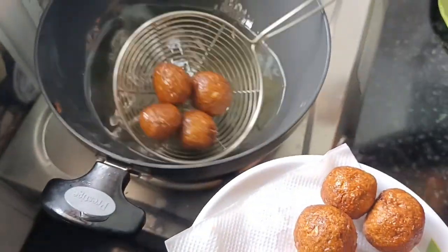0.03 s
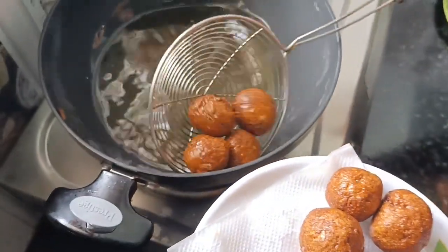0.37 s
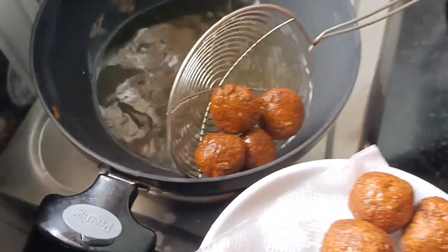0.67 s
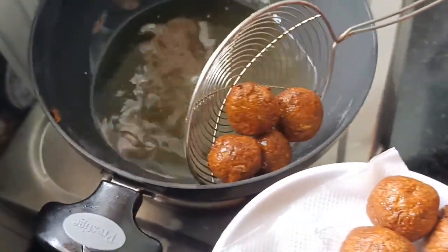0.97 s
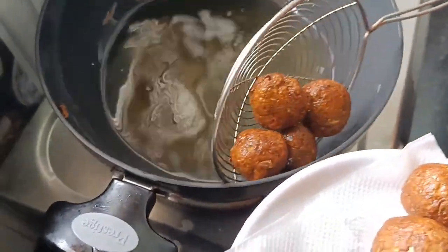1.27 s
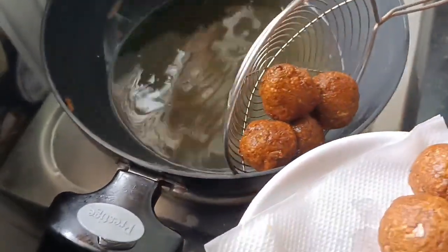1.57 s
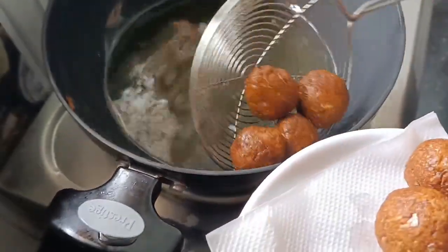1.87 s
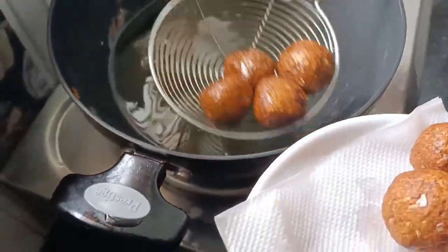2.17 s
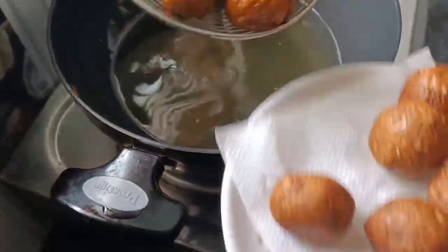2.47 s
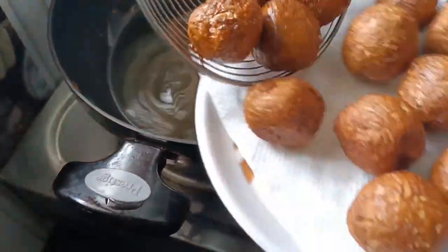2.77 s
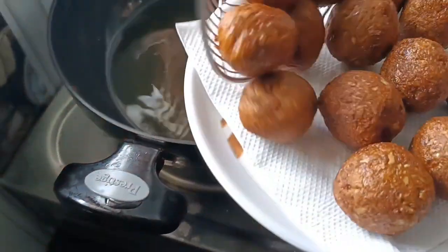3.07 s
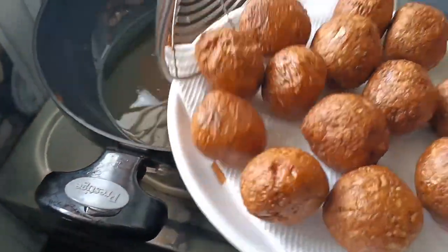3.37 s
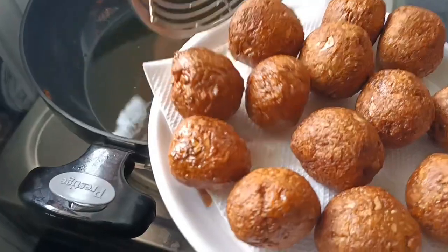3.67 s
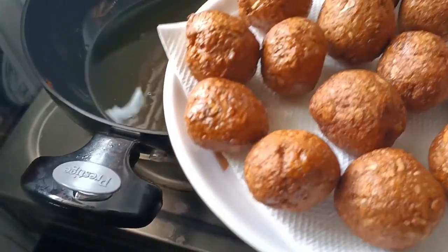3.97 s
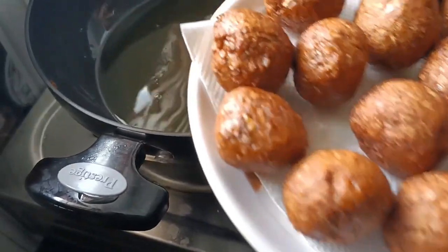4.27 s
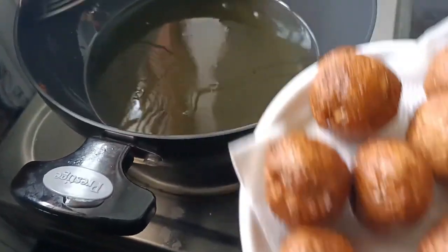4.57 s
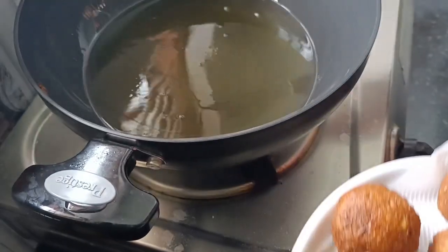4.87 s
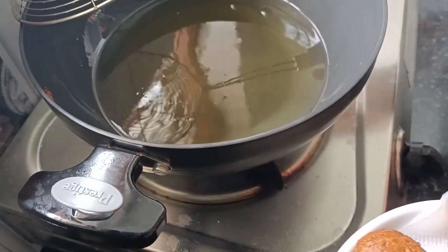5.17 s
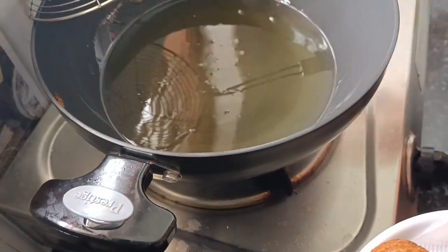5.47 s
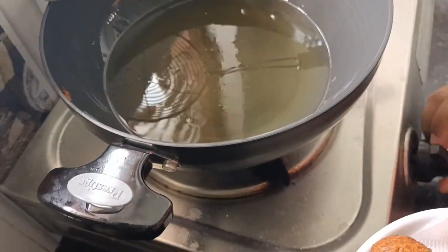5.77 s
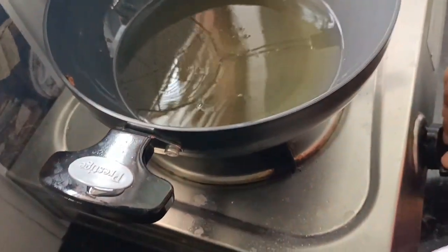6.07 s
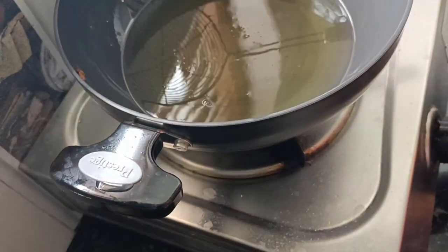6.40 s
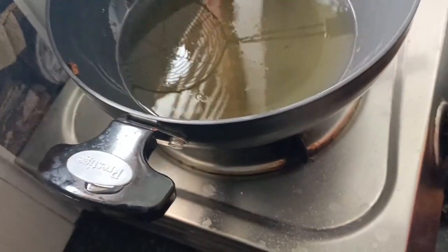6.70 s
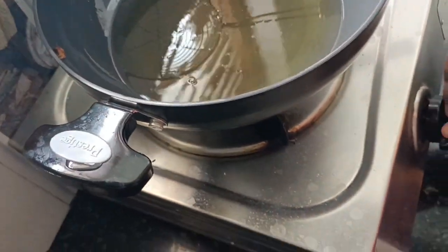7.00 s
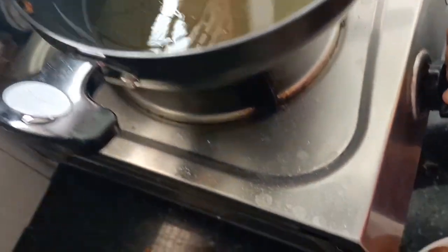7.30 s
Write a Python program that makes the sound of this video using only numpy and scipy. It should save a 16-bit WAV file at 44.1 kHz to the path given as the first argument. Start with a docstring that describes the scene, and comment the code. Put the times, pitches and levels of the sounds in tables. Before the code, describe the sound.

Oil sizzles lightly as a wire strainer scrapes, squeaks and clinks in a pan, then is dropped on steel with a clank and clatter.

```python
"""Oil sizzles lightly over a low kitchen drone. From 0.2 s the pan is nudged and a wire strainer scrapes,
squeaks and clinks in it, lifting fried balls onto a plate with soft knocks. At 4.6 s the strainer is
dropped on steel beside the stove: one clank, then a clatter at 5.1 s. From 5.75 s the oil settles under
a few last clinks and squeaks, and the drone swells. A phone close by hears it all through two ports,
each with its own treble colour."""
import sys
import numpy as np
from scipy import signal
from scipy.fft import rfft, irfft, next_fast_len
from scipy.io import wavfile

SR = 44100
rng = np.random.default_rng(int(sys.argv[2]) if len(sys.argv) > 2 else 0)


def pcm_store(signal):
    """Save signal as 16-bit PCM."""
    levels = np.round(np.clip(np.atleast_2d(signal), -1, 1) * 32767)
    wavfile.write(sys.argv[1], SR, levels.astype(np.int16).T)


N = 323694
TIME_S = np.arange(N) / SR
EVENT_N = int(.7 * SR)
EVENT_S = np.arange(EVENT_N) / SR


def undb(db):
    """Decibels to gain."""
    return 10 ** (np.asarray(db) / 20)


def unit(x):
    """Scale to rms 1."""
    return x / np.sqrt(np.mean(x ** 2) + 1e-20)


def shape(x, gain):
    """Filter x by gain(Hz)."""
    size = next_fast_len(x.shape[-1])
    hz = np.maximum(np.arange(size // 2 + 1) * SR / size, 1)
    return irfft(rfft(x, size) * gain(hz), size)[..., :x.shape[-1]]


def colour(points):
    """Gain curve through (frequency [Hz], level [dB]) points."""
    hz, db = np.transpose(points)
    return lambda f: undb(np.interp(np.log(f), np.log(hz), db))


def peak(hz, width_hz):
    """Gain curve of a resonance."""
    return lambda f: 1 / (1 + ((f - hz) / width_hz) ** 2)


def stereo(pair, apart_hz=700, bass_side=0.014):
    """Left and right from two signals: alike in the bass, unrelated in the treble."""
    side = shape(pair[1], lambda f: bass_side + f ** 2 / (f ** 2 + apart_hz ** 2))
    return np.array([pair[0] + side, pair[0] - side])


def noise(gain, size=EVENT_N):
    """Coloured stereo noise, rms 1."""
    return unit(shape(stereo(rng.standard_normal((2, size))), gain))


def walk(rate_hz, size=EVENT_N):
    """Smooth random drift, rms 1."""
    return unit(shape(rng.standard_normal(size), lambda f: 1 / (1 + (f / rate_hz) ** 4)))


def attack(rise_s):
    """Build-up of a contact."""
    return 1 - np.exp(-EVENT_S / max(rise_s, .0002))


def fade(t60_s):
    """Exponential decay."""
    return np.exp(-np.log(1000) * EVENT_S / max(t60_s, .005))


def arch(time_s, length_s, fullness):
    """Smooth rise and fall; a lower exponent is squarer."""
    return np.maximum(np.sin(np.pi * np.clip(time_s / length_s, 0, 1)), 1e-12) ** fullness


def add(out, at_s, sound):
    """Mix a sound in at a time."""
    start = int(at_s * SR)
    out[:, start:start + sound.shape[1]] += sound[:, :N - start]


def modes(hz, spread_hz, t60_s, build_cycles=1.1, count=7):
    """Similar wires flank each mode with weaker partials; axes (mode, partial, time)."""
    offset = np.linspace(-1, 1, count)
    weight = 1 / (1 + 1.5 * np.abs(offset))
    partial_hz = hz[:, None] + spread_hz[:, None] * offset * rng.uniform(0.503, 2.45, (len(hz), count))
    phase = 2 * np.pi * partial_hz[..., None] * EVENT_S
    # energy takes some cycles to spread from the contact: low modes come late
    envelope = np.array([fade(t) * attack(build_cycles / f) for f, t in zip(hz, t60_s)])
    envelope = envelope[:, None] * weight[:, None] / np.linalg.norm(weight)
    return np.concatenate([np.sin(phase) * envelope, np.cos(phase) * envelope], axis=1)


def ring(bank, mode_db, width=0.64):
    """Each blow shares its energy among the partials anew, per port."""
    mid = rng.choice([-1., 1.], bank.shape[:2])
    side = width * rng.standard_normal(bank.shape[:2])
    weights = np.array([mid + side, mid - side]) * undb(mode_db)[:, None] / np.sqrt(1 + width ** 2)
    return np.tensordot(weights, bank, 2)


def sizzle(bursts_per_s=2500, start_db=-50, sag_db_per_s=0.54, settle_at_s=5.75, settle_db_per_s=7):
    """Tiny steam bubbles burst over a flickering hiss, dying down as the oil settles."""
    # oil spectrum: (frequency [Hz], level [dB])
    oil = [(290, -76), (500, -2.5), (1810, -3.5), (2350, -1.5), (2830, -3.5), (3420, -5.5), (7240, -10.5),
           (8250, -6.5), (14100, -7), (15800, -7)]
    bursts = (rng.random((2, N)) < bursts_per_s / SR) * rng.standard_normal((2, N))
    bursts *= undb(2 * np.minimum(rng.exponential(size=(2, N)), 6))  # a few stand out
    fizz = stereo(.5 * unit(bursts) + rng.standard_normal((2, N)))
    db = start_db - sag_db_per_s * TIME_S - settle_db_per_s * np.maximum(TIME_S - settle_at_s, 0)
    return unit(shape(fizz, colour(oil))) * undb(db + 1.5 * walk(15, N))


def kitchen(drone_hz=84.4, wander_hz=3.48, drone_db=-53, air_db=-52.5):
    """A wavering low drone that swells now and then, two faint hums and a rush of air."""
    # drone swells: (time [s], length [s], level [dB])
    swells = [(.28, 0.17, -48), (0.792, 0.18, -46.5), (2.248, 0.4, -49), (4.53, 0.4, -50.5),
              (5.18, 0.13, -48), (5.798, .35, -45.5), (6.314, .26, -39.5), (6.523, 0.31, -39.5),
              (7.272, 0.36, -33.5)]
    # hums: (frequency [Hz], width [Hz], level [dB])
    hums = [(110, 31, -58), (214.9, 17.6, -58)]
    # air spectrum: (frequency [Hz], level [dB])
    air_colour = [(20, -5.5), (45, 15.5), (65, -0.5), (150, -12.5), (210, 1.5), (300, -3), (450, -3.5),
                  (800, -8.5), (1500, -10.5), (3000, -13), (6000, -24)]
    pitch_hz = drone_hz + wander_hz * walk(7.84, N)
    tone = unit(np.sin(2 * np.pi * np.cumsum(pitch_hz) / SR))
    base = undb(drone_db) * unit(undb(4 * walk(9.1, N)))
    surge = sum(undb(db) * arch(TIME_S - at_s, length_s, 0.77) for at_s, length_s, db in swells)
    surge *= undb(2 * walk(14, N))
    hum = sum(undb(db) * noise(peak(hz, width_hz), N) for hz, width_hz, db in hums)
    air = noise(colour(air_colour), N) * undb(air_db + 1.03 * walk(10, N))
    return tone * np.hypot(base, surge) + hum + air


def nudges(body_hz=211, width_hz=8.8):
    """The pushed pan hums in its body resonance and rubs on its stand."""
    # pushes: (time [s], length [s], body [dB], rub [dB])
    pushes = [(0.158, 0.65, -50, -53), (1.988, 0.7, -51, -52), (5.61, 0.27, -53, -52.5)]
    # rub spectrum: (frequency [Hz], level [dB])
    rub_colour = [(100, -25), (250, 10), (450, -2), (800, -3.5), (1500, -6), (3000, -7.5), (6000, -28)]
    body = noise(peak(body_hz, width_hz), N)
    rub = noise(colour(rub_colour), N)
    return sum(arch(TIME_S - at_s, length_s, 0.54) * (undb(body_db) * body + undb(rub_db) * rub)
               for at_s, length_s, body_db, rub_db in pushes)


def scrapes(slip_db=1.2, hiss=0.08, edge=0.11):
    """Wire dragged over the pan rasps in uneven slips."""
    # strokes: (time [s], length [s], level [dB], resonance tilt [dB/oct])
    strokes = [(0.231, 0.045, -52, -9), (2.065, 0.079, -43.5, -12)]
    # dragged-wire resonances: (frequency [Hz], width [Hz], level [dB])
    resonances = [(3060, 97, -7.5), (3920, 59, -8.5), (5210, 170, -2.5), (6560, 340, -7), (8150, 110, 4),
                  (10600, 540, 10)]
    out = np.zeros((2, N))
    for at_s, length_s, db, tilt in strokes:
        rasp = noise(lambda f: hiss * f / (f + 3000) + sum(
            undb(peak_db + tilt * np.log2(hz / 5000)) * peak(hz, width_hz)(f)
            for hz, width_hz, peak_db in resonances))
        pressure = np.clip(np.minimum(EVENT_S, length_s * (1 + edge) - EVENT_S) / (edge * length_s), 0, 1)
        add(out, at_s, undb(db) * pressure * unit(rasp * undb(slip_db * walk(100))))
    return out


def squeaks(waver_db=2.1, jitter_rate_hz=220):
    """Wire sticks and slips in step with one mode; pressure glides the pitch, jitter roughens it."""
    # squeaks: (time [s], length [s], pitch [Hz], glide [Hz/s], roughness [Hz], level [dB], octave [dB])
    slips = [(0.229, 0.041, 3430, 0, 20, -48.5, -30), (0.229, .07, 3800, 0, 51, -52, -30),
             (0.476, 0.2, 3353, 0, 21, -44.5, -35), (0.663, 0.096, 3340, 0, 24, -51, -35),
             (.81, .14, 3353, 0, 22, -56.5, -35), (.93, 0.4, 3376, -7, 35, -65, -30),
             (1.719, 0.2, 2632, 200, 13, -48.5, -37), (2.3, 0.16, 3276, 1800, 68, -52.5, -30),
             (2.468, .2, 3380, -3, 106, -53, -30), (2.67, 0.19, 3390, 400, 130, -54, -30),
             (4.098, 0.14, 1428, 0, 8.2, -55, 0), (5.53, 0.15, 4480, -7, 39, -57, -44),
             (5.736, 0.11, 2280, 0, 17, -52.5, -5.5), (5.815, 0.038, 2280, 0, 10, -41, -26),
             (5.81, 0.049, 3410, 0, 14, -48, -23), (5.93, 0.29, 1867, -3, 82, -61, -15),
             (7.119, 0.45, 4620, 695, 83, -61.5, -30)]
    out = np.zeros((2, N))
    for at_s, length_s, hz, glide, rough_hz, db, octave_db in slips:
        pitch_hz = hz + glide * (EVENT_S - length_s / 2) + rough_hz * walk(jitter_rate_hz)
        phase = 2 * np.pi * np.cumsum(pitch_hz) / SR + np.array([[0], [.8]])
        tone = (np.sin(phase) + undb(octave_db) * np.sin(2 * phase)) * undb(waver_db * walk(55))
        add(out, at_s, undb(db) * arch(EVENT_S, length_s, 0.63) * unit(tone))
    return out


def clinks(low_hz=1800, favoured_oct=0.24, contact_s=0.0017):
    """Wire taps the pan: a crack, and a short ring in the modes the contact point favours."""
    # wire rim on the pan: (frequency [Hz], spread [Hz], level [dB], free t60 [s])
    pan_modes = [(1840, 178, -10, 0.24), (2355, 226, 2.5, 0.076), (3320, 110, -26, 0.04),
                 (5070, 113, -10, 0.2), (6070, 110, -7, 0.1), (6780, 160, -8.5, 0.19),
                 (8860, 400, 3.5, 0.097), (10940, 290, 9.5, 0.054)]
    # taps: (time [s], ring [dB], favoured [Hz], share of free t60 [0-1], crack [dB],
    #        crack tilt re pink [dB/oct], crack t60 [s])
    taps = [(0.235, -45, 3550, 0.5, -37.5, -1, 0.051), (.266, -35, 7000, 0.67, -34, 6.5, 0.065),
            (0.538, -55, 3000, .6, -40, -6.5, 0.11), (1.9399, -26.5, 5400, 0.7, -27, 6.5, 0.12),
            (2.8241, -23, 2400, 0.43, -20.5, -2, 0.026), (2.826, -38, 11100, 0.64, -38.5, -11, 0.072),
            (2.8375, -48, 10000, .4, -34, 8, 0.094), (2.911, -35, 2600, 0.3, -37.5, -2, 0.035),
            (5.8192, -34.5, 6160, 0.38, -43.5, -3.5, 0.4), (5.918, -43, 6460, 0.57, -39.5, -2.5, 0.12),
            (6.779, -49, 3000, 0.56, -39.5, -2.5, 0.14), (6.803, -53, 3000, .5, -44, -6, .08)]
    out = np.zeros((2, N))
    hz, spread_hz, mode_db, t60_s = np.transpose(pan_modes)
    for at_s, ring_db, favoured_hz, share, crack_db, tilt, crack_t60_s in taps:
        crack = noise(lambda f: f ** 2 / (f ** 2 + low_hz ** 2) * undb((tilt - 3) * np.log2(f / low_hz)))
        loss_db = 10 * np.log10(1 + (np.log2(hz / favoured_hz) / favoured_oct) ** 2)
        rim = ring(modes(hz, spread_hz, share * t60_s), ring_db + mode_db - loss_db)
        add(out, at_s, (rim + undb(crack_db) * crack * fade(crack_t60_s)) * attack(contact_s))
    return out


def knocks_squeak_and_ring():
    """Bands of decaying noise: mostly soft knocks, plus one squeak and one ring."""
    # noise bands: (time [s], level [dB], centre [Hz], spread [oct], rise [s], t60 [s])
    # 2.36 s: a brief thin squeak near 3.4 kHz; 5.165 s: a short 800 Hz ring, strainer knocking on steel
    bands = [(0.271, -41.5, 250, 1, 0.0055, 0.27), (0.539, -47.5, 586, 1.1, 0.0031, 0.61),
             (.725, -48.5, 776, 0.66, .01, 0.38), (1.3322, -43.5, 2480, 1.2, 0.0027, 0.095),
             (1.954, -45, 480, 0.88, 0.0034, 0.53), (1.978, -24.5, 239, 0.12, 0.0023, 0.11),
             (2.159, -36, 1070, 1.36, 0.0056, 0.15), (2.3623, -41, 3380, 0.5, .002, 0.079),
             (2.83, -39, 168, 0.16, .003, 0.13), (3.05, -38, 3730, 0.28, 0.0043, 0.096),
             (3.3389, -42, 296, 1.9, 0.0024, 0.11), (3.36, -46, 4000, 1.8, .01, 0.26),
             (3.4283, -45, 2490, 1, .002, 0.084), (3.778, -35, 1070, 0.35, 0.0011, 0.056),
             (5.165, -19.5, 800, 0.062, 0.0036, 0.11), (5.832, -42, 583, 0.76, 0.017, 0.64),
             (5.88, -34, 212, 0.092, 0.0066, 0.39), (5.925, -40.5, 510, 0.84, .004, .17),
             (6.05, -44.5, 350, 1.4, 0.0071, 0.14), (7.1755, -41.5, 580, 0.53, 0.00095, 0.16)]
    out = np.zeros((2, N))
    for at_s, db, hz, spread_oct, rise_s, t60_s in bands:
        band = noise(lambda f: 1 / (1 + (np.log2(f / hz) / spread_oct) ** 2 / 2) ** 2)
        add(out, at_s, undb(db) * band * fade(t60_s) * attack(rise_s))
    return out


def strainer_drop(jangle_t60_s=0.26, crack_t60_s=0.07, crack=0.62, thud_t60_s=0.32, rim_t60_s=0.83):
    """Each blow rings the hoop and jangles the wires; the steel top answers a little later."""
    # hoop on steel: (frequency [Hz], spread [Hz], struck flat [dB], struck on rim [dB], t60 [s])
    hoop_modes = [(645, 4.7, -29, -91, 0.49), (877, 15, -29, -51, 0.32), (1321, 20.5, -28, -26.5, 0.32),
                  (1408, 35, -30.5, -45, 0.18), (1508, 70, -29.5, -64, 0.44),
                  (1723, 13.2, -33.5, -45, 0.53), (1865, 20.7, -34, -40.5, 0.5), (2287, 24, -27, -34, 0.29),
                  (2405, 32, -31.5, -34.5, 0.24), (2843, 40, -20, -23.5, 0.14), (3027, 16, -29, -37, 0.19),
                  (3430, 21, -32, -32, 0.26), (3750, 29, -23, -30, 0.21), (3990, 110, -29, -41, 0.29),
                  (4500, 30, -25, -40, 0.12), (4680, 49, -26.5, -29, 0.21), (5170, 52, -25, -41, 0.28),
                  (5480, 79, -28, -47, 0.21), (6070, 58, -79, -36, 0.27), (6630, 35.7, -30.5, -40, 0.27),
                  (7340, 93, -30, -28, 0.18), (8180, 16, -34, -44, 0.29), (9380, 69, -33, -21, 0.051),
                  (11300, 54, -31, -33, 0.071)]
    # blows: (time [s], ring [dB], jangle [dB], thud [dB], on rim [0-1], contact [s])
    blows = [(4.6394, 1, -12, -28, 0, .001), (4.668, -11, -32, -27, .1, .004),
             (4.793, -19, -42, -50, .5, .003), (5.0832, -2, -18.5, -40, 1, .0015),
             (5.1155, 1, -15.5, -40, 1, .002), (5.149, -7, -21, -46, .9, .001),
             (5.165, 0, -22, -24, .9, .002), (5.19, -6, -30, -36, .8, .004)]
    # wire spectrum: (frequency [Hz], level [dB])
    jangle = [(1000, -23), (1500, -23), (2050, -19), (3000, -12), (4300, -10), (4800, -7), (7000, -3.5),
              (9000, -1), (11000, -6), (15500, -6.5)]
    # steel top: (frequency [Hz], width [Hz], struck flat [dB], struck on rim [dB])
    top_modes = [(206, 9.3, 3.5, -3), (253.7, 7.1, -2, 14.5), (350, 30.3, -1.5, -0.5), (422, 3.5, -2, 6.5),
                 (540, 22, -7, 4.5), (611, 19, -5.5, -6), (710, 37, -0.5, -15), (791, 6.7, -26.5, 5),
                 (914, 74, -7.5, -13)]
    out = np.zeros((2, N))
    hz, spread_hz, flat_db, rim_db, t60_s = np.transpose(hoop_modes)
    bank = modes(hz, spread_hz, t60_s, build_cycles=17)
    for at_s, ring_db, jangle_db, thud_db, rim, contact_s in blows:
        # the contact point sets mode balance and wire brightness
        blend = lambda flat, on_rim: (1 - rim) * flat + rim * on_rim
        hoop = ring(bank, ring_db + blend(flat_db, rim_db))
        wires = noise(lambda f: colour(jangle)(f) * undb(blend(-5, -6.5) * np.log2(1 + f / 4000)))
        # loose wires crack, then chatter
        chatter = undb(walk(260) * attack(0.024))
        wires *= (fade(jangle_t60_s) * chatter + crack * fade(crack_t60_s)) / (1 + crack)
        top = noise(lambda f: sum(undb(blend(flat, on_rim)) * peak(top_hz, width_hz)(f)
                                  for top_hz, width_hz, flat, on_rim in top_modes))
        thud = undb(thud_db) * top * fade(thud_t60_s) * attack(0.011)
        damping = fade(rim_t60_s) ** rim  # resting on its rim damps the strainer
        add(out, at_s, (hoop + undb(jangle_db) * wires) * attack(contact_s) * damping + thud)
    return out


def room(x, t60_s=0.34, wet_db=-11):
    """Hard kitchen walls return a short tail, strongest near 3 kHz."""
    tail = shape(rng.standard_normal((2, EVENT_N)), colour([(200, -9), (3000, 12), (15000, -1)]))
    tail = tail * fade(t60_s) * attack(0.0013)
    tail /= np.sqrt(np.sum(tail ** 2, axis=1, keepdims=True))
    return x + undb(wet_db) * signal.fftconvolve(x, tail, axes=1)[:, :N]


def from_right(x, lag_s=0.00034):
    """Sound from the right reaches the left port later."""
    return np.array([np.interp(TIME_S - lag_s, TIME_S, x[0]), x[1]])


def scene():
    """Utensils in the room, over oil and kitchen."""
    utensils = strainer_drop() + clinks() + knocks_squeak_and_ring() + scrapes() + squeaks()
    return room(utensils) + sizzle() + from_right(kitchen() + nudges())


def record(dry, cutoff_hz=15900):
    """Each port colours the treble in its own way; a steep low-pass follows."""
    # port responses: (frequency [Hz], left [dB], right [dB])
    ports = [(2740, -0.5, -0.5), (4800, 1.5, -2), (6330, 6.5, 1), (6830, 5.5, -24), (7440, -2, 1),
             (7910, -20, 5), (8550, -7.5, 4.5), (10200, 0, 2.5), (12300, 0.5, 2), (14500, 8, -11.5),
             (15100, 4, -16)]
    hz, *port_db = np.transpose(ports)
    heard = np.array([shape(x, colour(np.column_stack([hz, db]))) for x, db in zip(dry, port_db)])
    return signal.sosfilt(signal.ellip(10, .2, 70, cutoff_hz, fs=SR, output="sos"), heard)


dry = scene()
out = record(dry)
pcm_store(out)
```